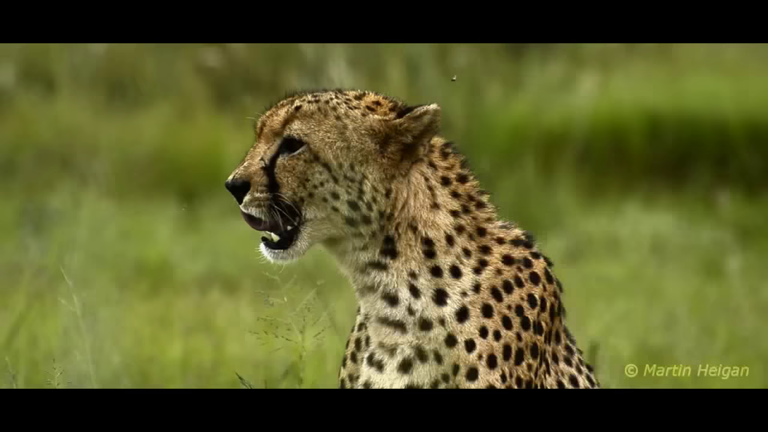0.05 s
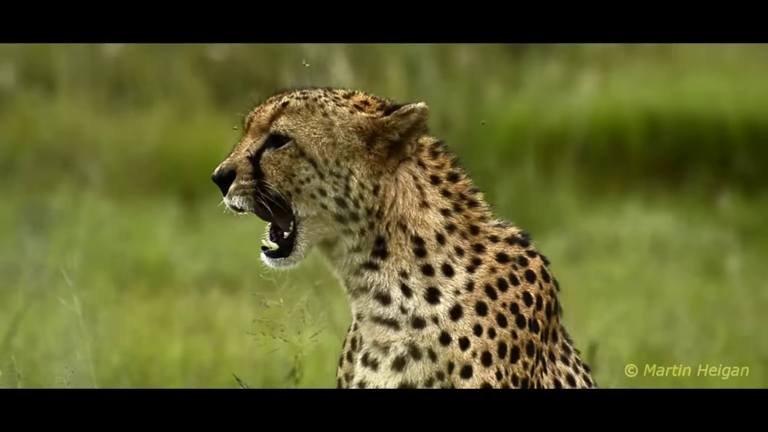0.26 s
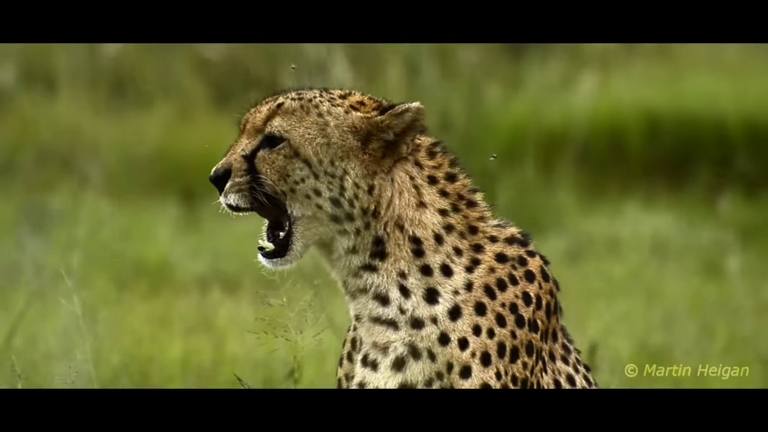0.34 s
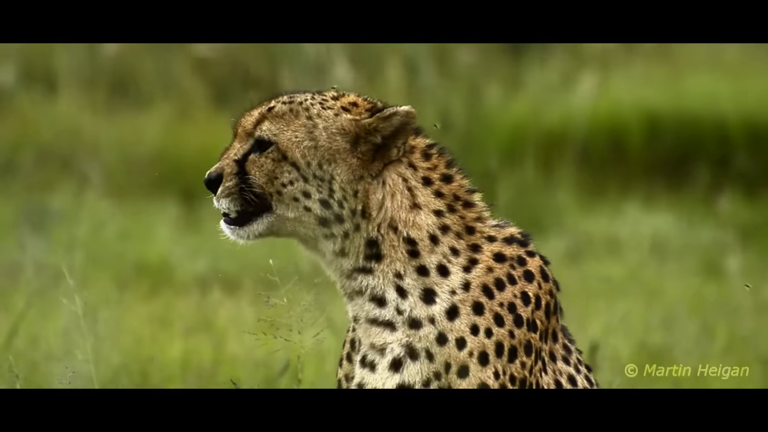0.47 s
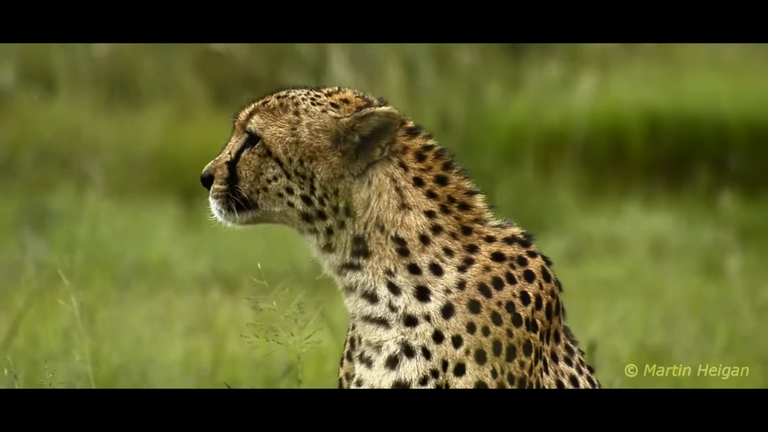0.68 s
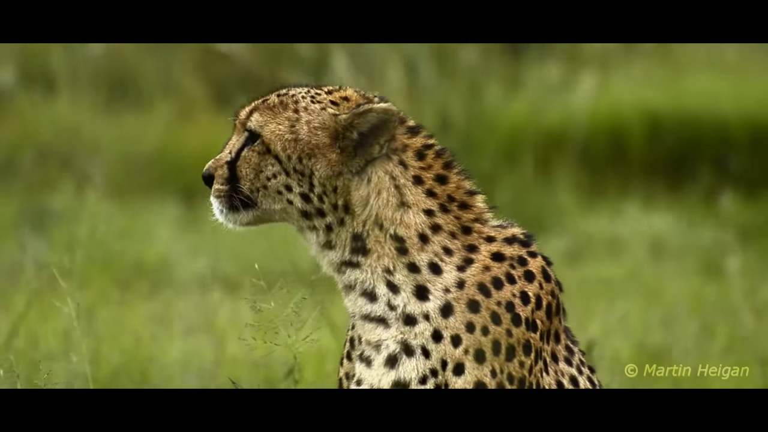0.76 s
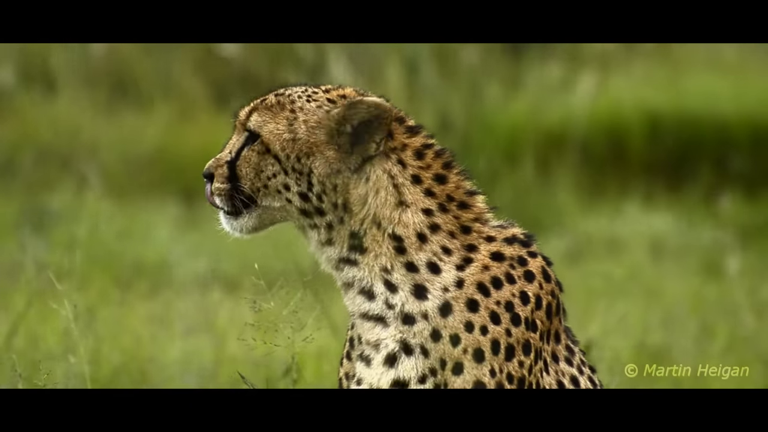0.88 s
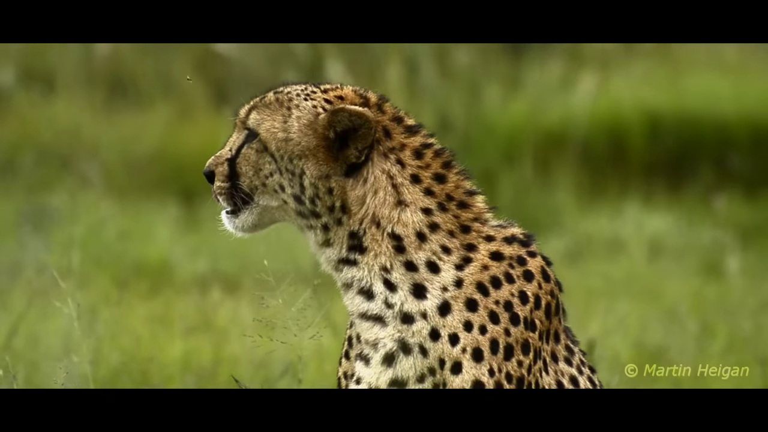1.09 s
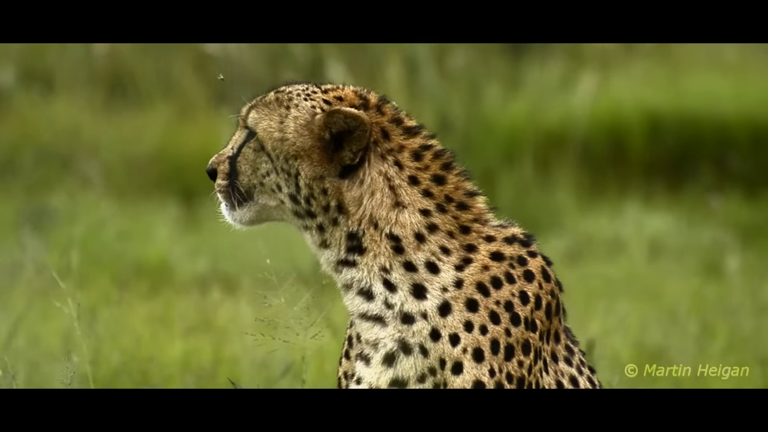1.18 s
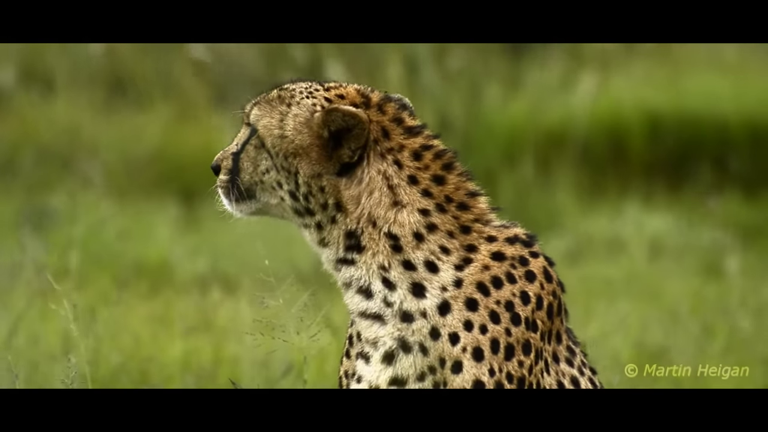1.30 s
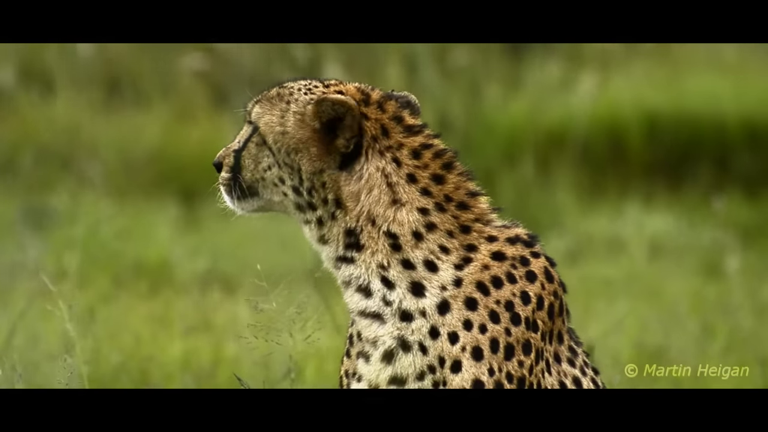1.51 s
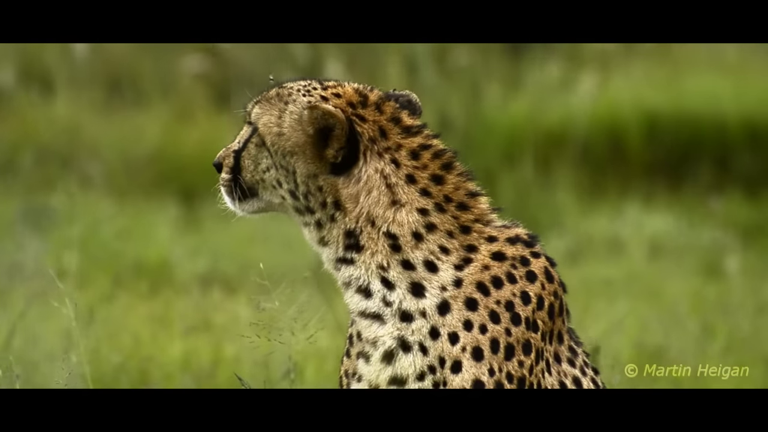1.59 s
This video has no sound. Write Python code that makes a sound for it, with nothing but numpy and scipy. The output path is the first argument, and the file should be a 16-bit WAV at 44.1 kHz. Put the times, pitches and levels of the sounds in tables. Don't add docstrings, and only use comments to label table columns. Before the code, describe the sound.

After a soft wind bump, one clear high cat chirp rises slightly and drops away; the rest is quiet open-air drone, faint insects, far birds and a few dull knocks, with light recorder hiss.

```python
import sys
import numpy as np
from scipy import signal
from scipy.fft import rfft, irfft
from scipy.io import wavfile
from scipy.ndimage import uniform_filter1d

SR = 44100
rng = np.random.default_rng(int(sys.argv[2]) if len(sys.argv) > 2 else 0)


def bounce(signal):
    frames = np.transpose(np.atleast_2d(signal))
    limited = np.clip(frames, -1, 1)
    pcm = np.round(limited * 32767).astype(np.int16)
    wavfile.write(sys.argv[1], SR, pcm)


def makeup_ratio(level_db):
    decades = np.asarray(level_db, float) / 20
    return 10 ** decades


N = 72765

# t/s, pitch f/Hz, vocal fold effort/dB, mouth resonance/dB, bright ring/dB
CHIRP_PATH = [(.209, 566.5, -54, -56.5, -74), (.215, 569.5, -45.5, -32, -51),
              (.231, 584, -47.5, -25, -49.5), (.25, 608.8, -45, -17.5, -48),
              (.27, 613.1, -46.5, -13.5, -35.5), (.287, 601.3, -46.5, -12, -34.5),
              (.3, 585.3, -44, -13.5, -40.5), (.316, 546, -43.5, -26.5, -46),
              (.327, 547, -46, -38.5, -56.5)]
# t/s, f/Hz, effort/dB, mouth/dB, ring/dB
TAIL_PATH = [(.334, 530, -47, -52, -61), (.341, 500, -48, -49, -68), (.35, 445, -52, -39, -62),
             (.357, 412, -51, -46, -57), (.363, 388, -56, -66, -68), (.374, 365, -74, -72, -72)]
# multiple of the pitch, offset/dB, shares of effort, mouth and ring [0-1]
WEAK_PARTIALS = [(3, 2, 1, .1, .05), (5, -7, .6, .2, .4), (6, -30, .6, .1, .3), (9, -56, .1, .7, .2),
                 (10, -57, .1, .7, .0), (13, -66, .1, .6, .1)]
# f/Hz, width/Hz, level/dB against effort
BREATH_LEAKS = [(1950, 240, -13), (2700, 600, -16)]
LEAK_FROM_S, LEAK_RISE_S = .265, .025
JITTER, SHIMMER_DB, BREATH_DB = .001, .33, -48
HOLLOW_HZ, HOLLOW_WIDTH_HZ, HOLLOW_DB = 1765, 22, -4
GRASS_DB, GRASS_T60_S = -34, .085

# t/s, f/Hz, level/dB
WHISTLE_PATH = [
    (.621, 1600, -70),
    (.628, 1660, -58),
    (.642, 1805, -57),
    (.659, 1845, -53),
    (.666, 1970, -56),
    (.67, 2100, -85),
    (.674, 2010, -55),
    (.682, 1770, -54),
    (.69, 1620, -72),
]
# start t/s, length/s, level/dB, body f/Hz
SOFT_KNOCKS = [
    (.605, .032, -44.5, 340),
    (.95, .05, -51, 280),
    (1.211, .044, -50, 360),
    (1.265, .06, -45, 340),
    (1.295, .05, -52, 520),
    (1.392, .034, -44, 335),
    (1.392, .03, -54, 490),
]
KNOCK_WIDTH_HZ, KNOCK_BUMPS_PER_S, KNOCK_DB, KNOCK_RUB = 170, 200, -1, .05
# start t/s, length/s, start f/Hz, end f/Hz, level/dB
BIRD_NOTES = [
    (.045, .035, 4850, 4350, -66),
    (.108, .045, 4480, 4200, -61),
    (.30, .058, 4750, 4200, -64),
    (.392, .045, 4450, 4200, -63),
    (.398, .025, 4100, 3980, -64),
    (.59, .03, 4200, 4050, -67),
    (.655, .045, 4200, 4150, -67),
    (1.265, .04, 920, 860, -59),
    (1.335, .03, 860, 880, -60),
]
BIRD_GRAIN = .55
# centre t/s, half length/s, level/dB, top f/Hz
WIND_PUFFS = [
    (.01, 0.043, -36.5, 56.7),
    (0.081, 0.038, -42, 50.3),
    (.675, .02, -63, 80),
    (.985, 0.087, -47, 68.6),
    (1.222, .03, -55, 120),
    (1.282, .04, -44.5, 170),
]

# f/Hz, width/Hz, level/dB
HUM_LINES = [(38.3, 6, -54), (74.5, 8, -75), (122.5, 9, -52), (158.8, 11, -54.5), (271.7, 5.4, -56.5),
             (607, 14.8, -61.5), (1226, 55, -67), (1513, 72, -66), (1787, 25, -84.5)]
HUM_STEADY = .58
INSECT_HZ, INSECT_WIDTH_HZ, INSECT_DB, INSECT_THROB_DB = 3650, 990, -64, 1
# f/Hz, level/dB per Hz
DRONE_COLOUR = [(12, -23.5), (20, 1.5), (212, -7), (276, -5), (514, -13.5), (1500, -19), (2260, -25.5),
                (3720, -23), (6000, -70), (7800, -68.5), (13200, -120)]
DRONE_DB, PATCH_DB, SWELL_DB = -49.5, .9, .5

# f/Hz, level/dB per Hz
HISS_COLOUR = [(60, -35), (220, -16), (560, -2.5), (1500, -1.5), (3250, -5.5), (5740, -11.5),
               (13900, -18.5), (15500, -27.5)]
HISS_DB, SHARED_HISS_DB = -61.5, 1
DUCK_DB, DUCK_TOP_HZ = -27.5, 3600
# f/Hz, width/Hz, depth/dB
NARROW_DIPS = [(5700, 120, -13), (6915, 45, -9), (15010, 125, -32)]


def evened(x):
    return x / np.sqrt(np.mean(x ** 2) + 1e-20)


def read(points, hz):
    f, value = np.transpose(points)
    return np.interp(np.log(hz + 1), np.log(f + 1), value)


def add(mix, start_s, sound):
    at = round(start_s * SR)
    part = mix[max(at, 0):][:len(sound) + min(at, 0)]
    part += sound[max(-at, 0):][:len(part)]


def phase(hz):
    return 2 * np.pi * np.cumsum(hz) / SR


def resonate(x, hz, width_hz):
    turn = np.exp(2j * np.pi * hz * np.arange(len(x)) / SR)
    r = np.exp(-np.pi * width_hz / SR)
    return 2 * (turn * signal.lfilter([1 - r], [1, -r], x / turn)).real


def drift(rate_hz):
    f = np.geomspace(rate_hz / 20, rate_hz, 24)[:, None]
    cycles = f * np.arange(N) / SR + rng.random(f.shape)
    return evened((np.sin(2 * np.pi * cycles) / np.sqrt(f)).sum(0))


def noise(points, patch_db):
    hz = np.fft.rfftfreq(1024, 1 / SR)
    a, b, patches = rng.standard_normal((N // 256 + 5, 513, 3)).T
    patches = evened(uniform_filter1d(uniform_filter1d(patches, 10, 0), 12, 1))
    frames = (a + 1j * b) * makeup_ratio(read(points, hz)[:, None] + patch_db * patches)
    return evened(signal.istft(frames, nperseg=1024, noverlap=768)[1][:N])


def cat():
    rows, t = np.array(list(CHIRP_PATH) + list(TAIL_PATH)), np.arange(N) / SR
    curves = [uniform_filter1d(np.interp(t, rows[:, 0], c), size=110) for c in rows.T[1:]]
    hz, effort, mouth, ring = curves
    turn = phase(hz * (1 + JITTER * drift(300)))
    voice = makeup_ratio(effort) * np.sin(turn) + makeup_ratio(mouth) * np.sin(2 * turn) + makeup_ratio(ring) * np.sin(4 * turn)
    for k, db, by_effort, by_mouth, by_ring in WEAK_PARTIALS:
        level = db + by_effort * effort + by_mouth * mouth + by_ring * ring + .51 * drift(86)
        hollow = HOLLOW_DB * np.exp(-((k * hz - HOLLOW_HZ) / HOLLOW_WIDTH_HZ) ** 2)
        voice += makeup_ratio(level + hollow) * np.sin(round(k) * turn)

    breath = rng.standard_normal(N)
    for width_hz in (500, 700, 900):
        breath = resonate(breath, 1250, width_hz)
    voice = np.sqrt(2) * voice * makeup_ratio(SHIMMER_DB * drift(200))
    voice += makeup_ratio(mouth + BREATH_DB) * evened(breath)
    opening = np.clip((t - LEAK_FROM_S) / LEAK_RISE_S, 0, 1)
    for f, width_hz, db in BREATH_LEAKS:
        leak = resonate(resonate(rng.standard_normal(N), f, width_hz), f, width_hz)
        voice += makeup_ratio(effort + db) * opening * evened(leak)
    voice *= np.clip(np.minimum(t - rows[0, 0], rows[-1, 0] - t) / .003, 0, 1)

    scatter = rng.standard_normal(SR // 4) * makeup_ratio(-60 * t[:SR // 4] / GRASS_T60_S)
    scatter /= np.linalg.norm(scatter)
    return voice + makeup_ratio(GRASS_DB) * signal.fftconvolve(voice, scatter)[:N]


def whistle():
    s, hz, db = np.transpose(WHISTLE_PATH)
    t = np.arange(N) / SR
    level = makeup_ratio(np.interp(t, s, db, left=-140, right=-140))
    return np.sqrt(2) * level * np.sin(phase(np.interp(t, s, hz)))


def knock(start, length, db, hz):
    chance, push, rub = rng.random((3, 6000))[:, :round(length * SR)]
    body = (chance < KNOCK_BUMPS_PER_S / SR) * (push - .5) + KNOCK_RUB * (rub - .5)
    for widening in (1, 1.6, 2):
        body = resonate(body, hz, widening * KNOCK_WIDTH_HZ)
    return start, makeup_ratio(db + KNOCK_DB) * evened(evened(body) * np.hanning(len(body)) ** .5)


def bird(start, length, from_hz, to_hz, db):
    u = np.linspace(0, 1, round(length * SR))
    a, b = evened(uniform_filter1d(rng.standard_normal((2, 4000)), size=90))[:, :len(u)]
    turn = phase(from_hz + (to_hz - from_hz) * u)
    note = (1 + BIRD_GRAIN * a) * np.sin(turn) + BIRD_GRAIN * b * np.cos(turn)
    return start, makeup_ratio(db) * 1.2 * np.sin(np.pi * u) ** .32 * note


def puff(centre, half_length, db, top_hz):
    low_pass = signal.butter(2, top_hz, fs=SR, output="sos")
    air = signal.sosfilt(low_pass, rng.standard_normal(12000))[-round(2 * half_length * SR):]
    return centre - half_length, makeup_ratio(db) * evened(air) * np.hanning(len(air))


def hums():
    out = np.zeros(N)
    for hz, width_hz, db in HUM_LINES:
        fuzz = resonate(resonate(rng.standard_normal(N + SR), hz, width_hz), hz, 2 * width_hz)
        fuzz = evened(fuzz[SR:])
        tone = np.sqrt(2) * np.sin(phase(hz + .3 * width_hz * drift(3.7)))
        out += makeup_ratio(db) * (HUM_STEADY * tone + (1 - HUM_STEADY) * fuzz)
    return out


def insects():
    buzz = rng.standard_normal(N)
    for _ in range(2):
        buzz = resonate(buzz, INSECT_HZ, INSECT_WIDTH_HZ)
    return makeup_ratio(INSECT_DB + INSECT_THROB_DB * drift(30)) * evened(buzz)


def drone():
    return makeup_ratio(DRONE_DB + SWELL_DB * drift(6.42)) * noise(DRONE_COLOUR, PATCH_DB)


def scene():
    mix = cat() + drone() + hums() + insects() + whistle()
    for source, rows in ((bird, BIRD_NOTES), (knock, SOFT_KNOCKS), (puff, WIND_PUFFS)):
        for row in rows:
            add(mix, *source(*row))
    return np.array([mix, mix])


def top_cut(x):
    return signal.sosfilt(signal.butter(12, 15620, fs=SR, output="sos"), x)


def record(dry):
    left, right = makeup_ratio(HISS_DB) * np.array([noise(HISS_COLOUR, .3), noise(HISS_COLOUR, .3)])
    shared, side = (left + right) / 2, (left - right) / 2
    power = uniform_filter1d(uniform_filter1d(dry[0] ** 2, size=1500), size=700)
    keep = 1 / (1 + abs(power) / makeup_ratio(2 * DUCK_DB))
    low = signal.sosfiltfilt(signal.butter(6, DUCK_TOP_HZ, fs=SR, output="sos"), side)
    side = side - low * (1 - keep)
    x = dry + makeup_ratio(SHARED_HISS_DB) * shared + np.array([side, -side])
    n = np.arange(N)
    x *= np.clip(np.minimum(n, 4 * n[::-1]) / SR / .004, 0, 1)
    hz = np.fft.rfftfreq(N, 1 / SR)
    dips = sum(db * np.exp(-((hz - f) / width_hz) ** 2) for f, width_hz, db in NARROW_DIPS)
    mix = irfft(rfft(x) * makeup_ratio(dips), N)
    return top_cut(mix)


dry = scene()
out = record(dry)
bounce(out)
```